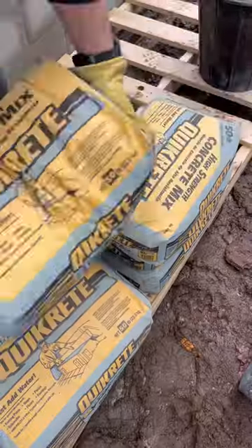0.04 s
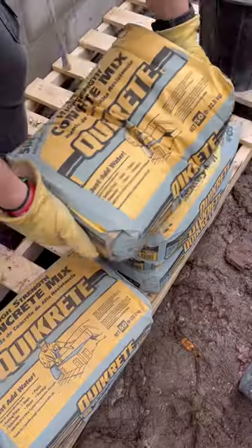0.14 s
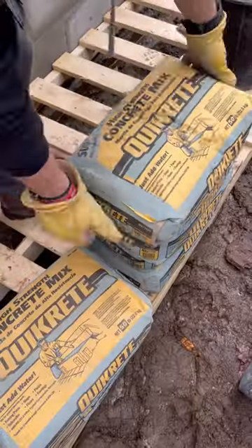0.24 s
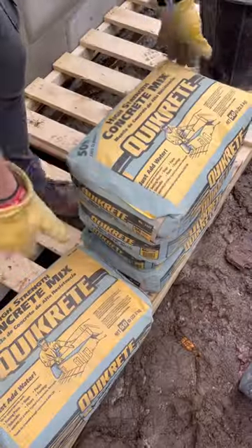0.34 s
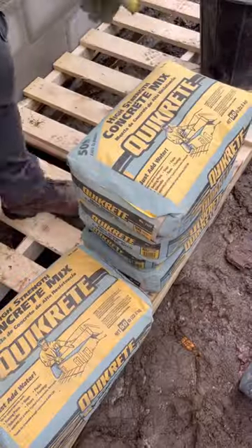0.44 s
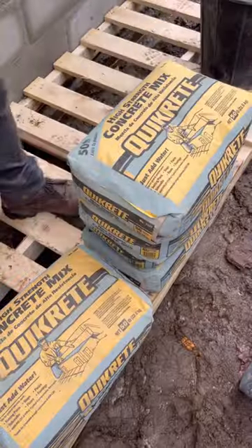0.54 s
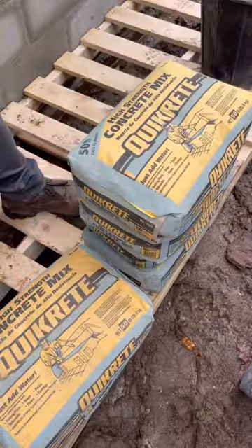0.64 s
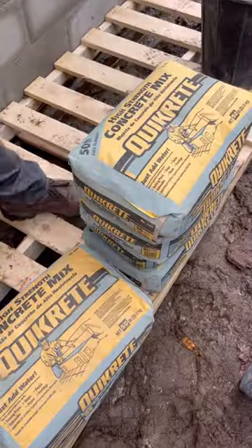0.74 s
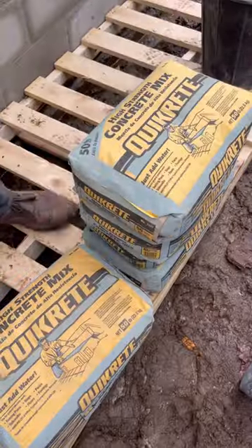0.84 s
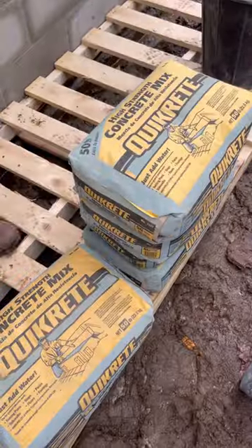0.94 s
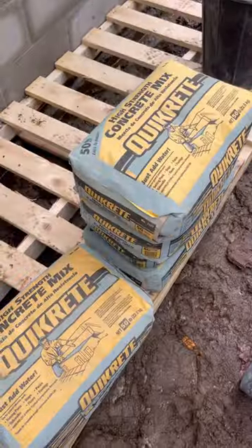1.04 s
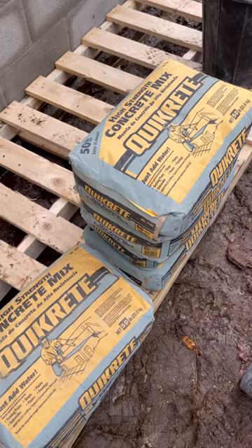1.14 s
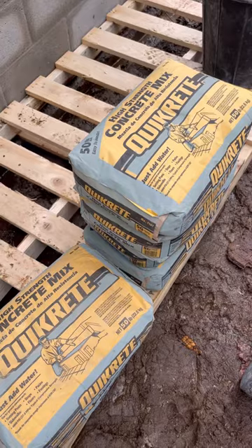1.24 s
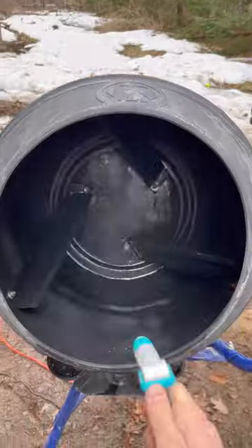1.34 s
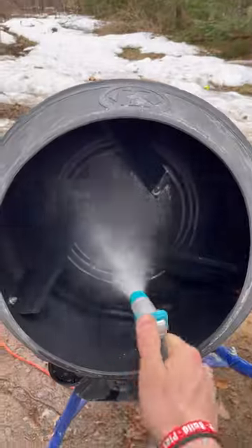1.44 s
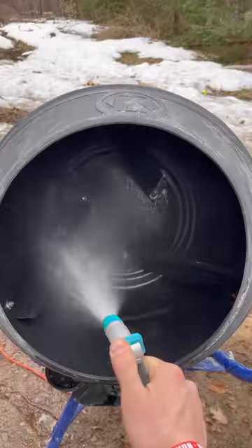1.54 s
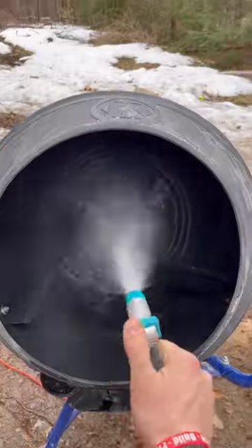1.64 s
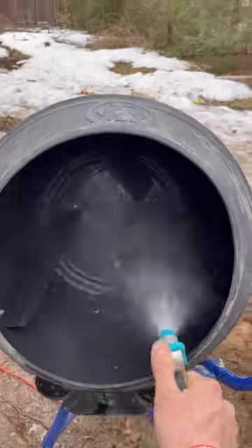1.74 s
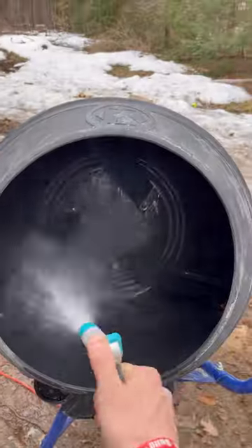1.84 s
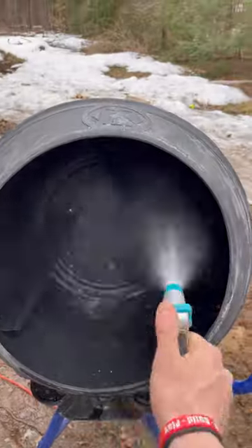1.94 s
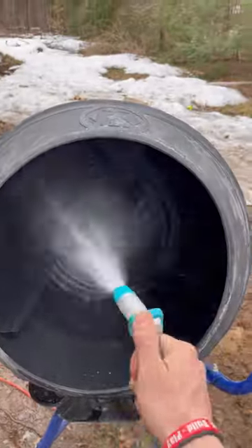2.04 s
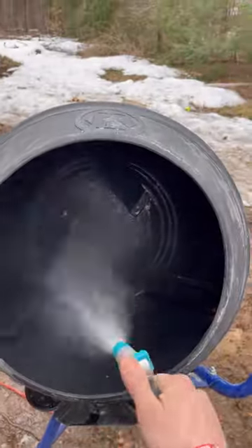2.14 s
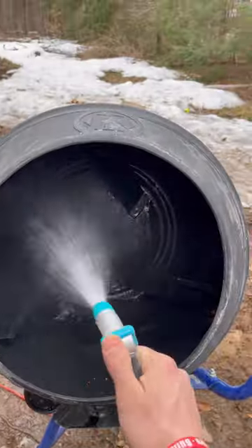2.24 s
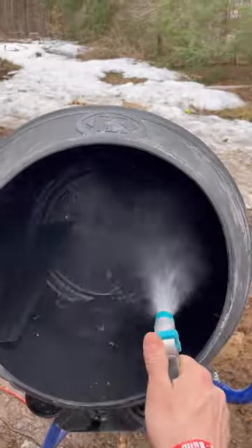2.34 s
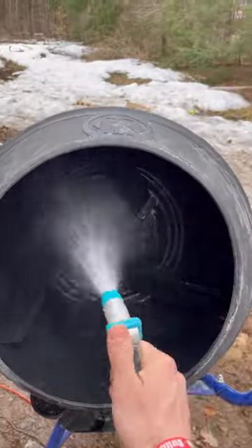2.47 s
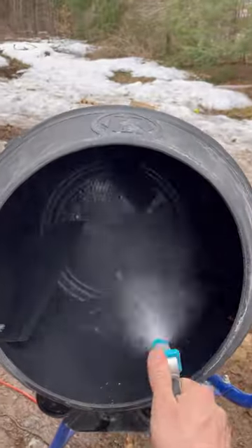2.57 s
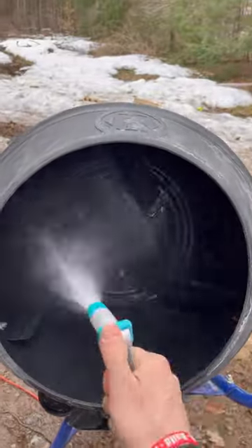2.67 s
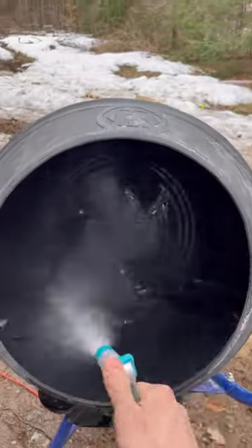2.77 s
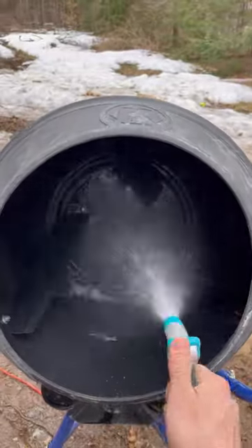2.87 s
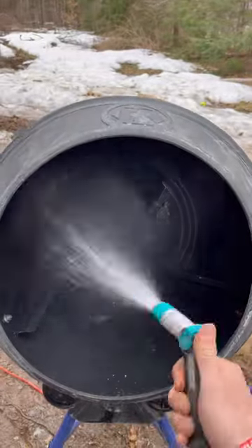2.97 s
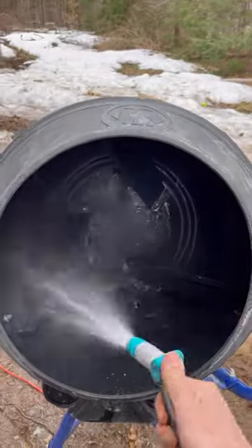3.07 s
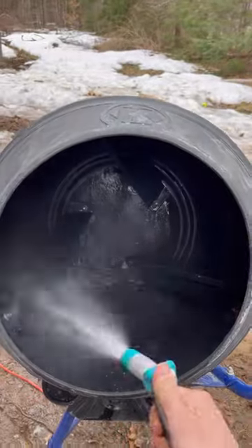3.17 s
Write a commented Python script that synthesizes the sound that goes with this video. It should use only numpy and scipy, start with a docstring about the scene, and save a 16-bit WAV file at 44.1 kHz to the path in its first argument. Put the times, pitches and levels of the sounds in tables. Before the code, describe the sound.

A hose nozzle sprays a hollow plastic drum, preceded by a paper sack's crunching thud

```python
"""A hose spray swept round inside a cement mixer's drum: noise-band mist hisses, random drops splash,
wall resonances drum, and the hollow hums and glugs, with short reflections added to mist and splash.
Before it a paper sack of concrete mix slides from gloved hands and lands on a stack on a pallet: shaped
noise and grains for the paper, decaying sines for the weight. A sole knocks on the slats, a short blip
falls in pitch, and filtered noise makes the nozzle click, leak and spit. A quiet yard lies behind."""
import sys
import numpy as np
from scipy import signal
from scipy.fft import rfft, irfft
from scipy.io import wavfile
from scipy.ndimage import uniform_filter1d

SR = 44100
rng = np.random.default_rng(int(sys.argv[2]) if len(sys.argv) > 2 else 0)


def store_wav(level_fs):
    """Save 16-bit WAV to argv[1]."""
    pcm = np.round(np.clip(np.atleast_2d(level_fs), -1, 1) * 32767)
    wavfile.write(sys.argv[1], SR, pcm.T.astype(np.int16))


N = 143325
T = np.arange(N) / SR
HZ = np.maximum(np.arange(N // 2 + 1) * SR / N, 1)
CUTOFF_HZ = 16000


def from_db(db):
    """Decibel definition: 20 dB is a tenfold amplitude ratio."""
    return 10 ** (np.asarray(db) / 20)


def rms_one(x):
    """Normalization: scale to unit rms."""
    return x / np.sqrt(np.mean(x ** 2) + 1e-20)


def curve(rows):
    """Amplitude envelope: gain interpolated in dB between (t/s, level/dB) points."""
    return from_db(np.interp(T, *np.transpose(rows)))


def response(points):
    """Frequency response: gain interpolated in dB over log frequency from (f/Hz, level/dB) points."""
    hz, db = np.transpose(points)
    return from_db(np.interp(np.log(HZ), np.log(hz), db))


def shaped(gain, source=None):
    """Linear filtering: white noise, or a given source, through a frequency response; rms 1."""
    if source is None:
        source = rng.standard_normal(N)
    return rms_one(irfft(rfft(source) * gain, N))


def resonances(modes, width_hz):
    """Modal resonance: steep-sided peaks at (f/Hz, level/dB), summed in power."""
    return np.sqrt(sum((from_db(db) / (1 + ((HZ - hz) / width_hz) ** 2)) ** 2 for hz, db in modes))


def band(hz, octaves):
    """Constant relative bandwidth: a bell on the octave scale."""
    return np.exp(-.5 * (np.log2(HZ / hz) / octaves) ** 2)


def burst(start, hold, t60):
    """Exponential decay: sudden start, hold, then a fall of 60 dB in t60."""
    decays = np.clip((T - start - hold) / t60, 0, 10)
    return (T >= start) * np.exp(-np.log(1000) * decays)


def swells(rows):
    """Power addition: bell-shaped swells from (t/s, level/dB, width/s) rows."""
    power = 0
    for s, db, width in rows:
        power = power + from_db(db) ** 2 * np.exp(-np.minimum(((T - s) / width) ** 2, 100))
    return np.sqrt(power)


def grains(per_s, spread_db):
    """Random impact process: dense tiny impulses of uneven size and sign."""
    sizes = from_db(spread_db * np.minimum(rng.exponential(1, N), 4))
    signs = rng.choice([-1, 1], N)
    return sizes * signs * (rng.random(N) < per_s / SR)


def evened(x, size):
    """Envelope flattening: divide a narrow noise by its running rms over size samples."""
    return x / np.sqrt(uniform_filter1d(x * x, size) + 1e-9)


def flicker(rate_hz, depth_db):
    """Amplitude modulation: a gain wandering at random by depth_db rms."""
    return from_db(depth_db * shaped(1 / (1 + (HZ / rate_hz) ** 2)))


def wavering(x, rate_hz, swing_s):
    """Frequency modulation by varying delay: the pitch wanders slowly; swing_s is rms."""
    delay = swing_s * shaped(np.exp(-(HZ / rate_hz) ** 2))
    return np.interp(T + delay, T, x)


def low_cut(x, hz):
    """Second-order high-pass filtering: roll off the bass."""
    return signal.sosfilt(signal.butter(2, hz, "high", fs=SR, output="sos"), x)


PATCH_HZ, PATCH_DB, PATCH_LOW_HZ = 16, 2.1, 1495


def patchy(gain, source, count=9):
    """Independent band modulation: overlapping bands each swell and fade on their own; rms 1."""
    place = np.interp(np.log(HZ), np.log([PATCH_LOW_HZ, CUTOFF_HZ]), [0, count - 1])
    spectrum = rfft(source) * gain
    total = 0
    for k in range(count):
        weight = np.maximum(1 - abs(place - k), 0)  # triangular band
        total = total + flicker(PATCH_HZ, PATCH_DB) * irfft(spectrum * weight, N)
    return rms_one(total)


SNAP_OCTAVES, SNAP_T60_S = 1.46, 0.013


def snaps(rows):
    """Impulsive radiation: short decaying cracks from (t/s, level/dB, f/Hz), each with its own brightness."""
    return sum(from_db(db) * burst(s, 0, SNAP_T60_S) * shaped(band(hz, SNAP_OCTAVES)) for s, db, hz in rows)


# spectrum of the yard: f/Hz, level/dB (relative)
YARD_SPECTRUM = [(30, -38), (135, 3.5), (350, -16), (1000, -25), (16000, -46)]
YARD_DB, YARD_END_S = -68.5, 1.34


def yard():
    """Broadband ambience: quiet, mostly low noise that holds, then decays exponentially."""
    return from_db(YARD_DB) * burst(0, YARD_END_S, t60=.2) * shaped(response(YARD_SPECTRUM))


STEP_S, STEP_DB, STEP_HOLD_S, STEP_T60_S = 1.089, -45, 0.015, 0.082
CRUSH_PER_S, CRACKLE_SPREAD_DB = 20000, 4
# spectrum of the slats underfoot: f/Hz, level/dB (relative)
SLAT_SPECTRUM = [(90, -12), (161, 8.5), (250, -8.5), (620, -1.5), (1050, -12), (1340, -2.5), (1650, -14),
                 (4500, -16), (9000, -24.5)]


def step():
    """Granular contact: a gritty sole knocks on the slats, whose response colours many tiny impacts."""
    grit = shaped(response(SLAT_SPECTRUM), grains(CRUSH_PER_S, CRACKLE_SPREAD_DB))
    return from_db(STEP_DB) * burst(STEP_S, STEP_HOLD_S, STEP_T60_S) * grit


# sack sliding and settling, soles scuffing: t/s, level/dB, width/s
RUSTLE_SWELLS = [(.03, -58, .04), (.082, -47.5, 0.017), (.16, -57, 0.035), (.23, -45, 0.015),
                 (.331, -38, 0.011), (.38, -56, 0.026), (.49, -58.5, 0.038), (.635, -52.5, 0.042),
                 (.94, -63, 0.12)]
# rustle spectrum: f/Hz, level/dB (relative)
RUSTLE_SPECTRUM = [(100, -7), (700, -1), (4500, 1), (9500, -6), (14000, 0)]
RUSTLE_PER_S = 3900


def rustle():
    """Granular friction: sparse grains swell as paper slides and soles scuff."""
    level = swells(RUSTLE_SWELLS) * flicker(rate_hz=31, depth_db=2.5)
    return level * shaped(response(RUSTLE_SPECTRUM), grains(RUSTLE_PER_S, CRACKLE_SPREAD_DB))


SLIDE_S, SLIDE_DB, SLIDE_WIDTH_S = 0.2364, -32, 0.0088
# spectrum of gloves on paper: f/Hz, level/dB (relative)
SLIDE_SPECTRUM = [(9000, -10.5), (12000, 4.5), (16000, -9)]


def slide():
    """Friction noise: gloves slip off the paper in one bright swell."""
    return swells([(SLIDE_S, SLIDE_DB, SLIDE_WIDTH_S)]) * shaped(response(SLIDE_SPECTRUM))


# the sack's paper is crushed on landing: t/s, level/dB
CRUSH_LEVEL = [(.2475, -23.5), (.262, -20), (.271, -23), (.275, -17.5), (.282, -24.5), (.296, -36),
               (.34, -80)]
# crushed paper spectrum: f/Hz, level/dB (relative)
PAPER_SPECTRUM = [(90, -4), (350, 3), (900, -4), (1600, 2), (4000, 2), (7000, -2)]
# creases snap and grit ticks: t/s, level/dB, f/Hz (centre)
CREASE_SNAPS = [(0.055, -42, 12200), (0.0705, -38.5, 12100), (0.1584, -39.5, 2480), (.2742, -12.5, 4500),
                (0.296, -26, 9000), (0.3335, -17.5, 4400), (0.3637, -20.5, 7100), (.611, -43.5, 5000),
                (.653, -42, 5230), (.679, -49, 600)]
# resonant peaks colour the crackle: f/Hz, level/dB (gain)
CRACKLE_PEAKS = [(2680, -3.5), (4356, 6), (5084, 3.5)]
PEAK_WIDTH_HZ = 110


def paper():
    """Resonant filtering: crushing grains and snaps pass through narrow resonant peaks."""
    crackle = shaped(response(PAPER_SPECTRUM), grains(CRUSH_PER_S, CRACKLE_SPREAD_DB))
    crush = curve(CRUSH_LEVEL) * (T > CRUSH_LEVEL[0][0]) * crackle
    crackling = crush + snaps(CREASE_SNAPS)
    coloured = 0
    for hz, db in CRACKLE_PEAKS:
        peak = signal.iirpeak(hz, hz / PEAK_WIDTH_HZ, fs=SR)
        coloured = coloured + from_db(db) * signal.lfilter(*peak, crackling)
    return crackling + coloured


# the weight comes down on the pallet: t/s, level/dB
THUD_BLOWS = [(0.253, -32), (0.262, -26.5), (0.281, -25.5), (0.311, -38.5), (.352, -42.5)]
# pallet modes: f/Hz, level/dB (added to each blow), t60/s
PALLET_MODES = [(119, 2.5, 0.082), (154.8, -6.5, 0.09)]


def thud():
    """Damped free vibration: each blow sets off the pallet's decaying sine modes."""
    total = 0
    for s, db in THUD_BLOWS:
        for hz, mode_db, t60 in PALLET_MODES:
            tone = np.sin(2 * np.pi * hz * (T - s))
            total = total + from_db(db + mode_db) * burst(s, 0, t60) * tone
    return total


def sack():
    """Superposition: friction, crushed paper and the weight on the pallet add together."""
    return slide() + rustle() + paper() + thud()


BLIP_S, BLIP_DB, BLIP_RISE_S, BLIP_HOLD_S, BLIP_T60_S = 1.2504, -36.5, 0.0007, 0.0086, .042
BLIP_DROP_HZ, BLIP_END_HZ, BLIP_FALL_S = 2440, 104, 0.00177


def blip():
    """Downward frequency glide: a sine's pitch drops within a few cycles."""
    hz = BLIP_END_HZ + BLIP_DROP_HZ / (1 + np.maximum(T - BLIP_S, 0) / BLIP_FALL_S) ** 2
    tone = np.sin(2 * np.pi * np.cumsum(hz * (T >= BLIP_S)) / SR)
    rise = np.clip((T - BLIP_S) / BLIP_RISE_S, 0, 1) ** 2
    return from_db(BLIP_DB) * rise * burst(BLIP_S, BLIP_HOLD_S, BLIP_T60_S) * tone


# the nozzle's trigger clicks: t/s, level/dB, f/Hz (centre)
TRIGGER_CLICKS = [(1.271, -52, 3500), (1.314, -60, 4600), (1.3235, -46, 1490)]
# the valve starts to leak: t/s, level/dB
VALVE_LEAK = [(1.324, -55.5), (1.375, -61.5), (1.43, -55)]
# leak spectrum: f/Hz, level/dB (relative)
LEAK_SPECTRUM = [(110, -21.5), (350, 2), (15000, -17)]
# spit spectrum: f/Hz, level/dB (relative)
SPIT_SPECTRUM = [(150, -27), (480, 11.5), (850, -1.5)]
SPIT_S, SPIT_DB, SPIT_HOLD_S, SPIT_T60_S = 1.435, -37.5, 0.01, 0.019


def nozzle():
    """Turbulent flow noise: the trigger clicks, the valve leaks, then the nozzle spits."""
    leak_gain = response(LEAK_SPECTRUM) * (HZ > LEAK_SPECTRUM[0][0])
    leak = curve(VALVE_LEAK) * (T > VALVE_LEAK[0][0]) * shaped(leak_gain)
    spit = burst(SPIT_S, SPIT_HOLD_S, SPIT_T60_S) * shaped(response(SPIT_SPECTRUM))
    return snaps(TRIGGER_CLICKS) + leak + from_db(SPIT_DB) * spit


# steady mist, before MIST_DB is added: t/s, level/dB
MIST_STEADY = [(1.45, -39.5), (2.98, -42), (3.04, -44)]
# mist spectrum: f/Hz, level/dB (relative)
MIST_SPECTRUM = [(200, -59), (4000, -7), (6500, -2.5), (8200, 2.5), (13600, 2), (16000, -5.5)]
# the hiss flares as the nozzle turns: t/s, level/dB
HISS_FLARES = [(1.61, -35.5), (1.832, -31.5), (2.19, -38), (2.31, -37), (2.425, -36), (2.64, -33.5),
               (2.865, -34)]
MIST_DB, FLARE_WIDTH_S, FLARE_HZ, FLARE_OCTAVES = 2, 0.017, 13200, 0.48


def mist():
    """Jet noise: a flickering hiss with bright flares; returns the middle and side signals."""
    level = from_db(MIST_DB) * curve(MIST_STEADY) * flicker(rate_hz=25, depth_db=1.54)
    flare_level = swells([(s, db, FLARE_WIDTH_S) for s, db in HISS_FLARES])
    flares = flare_level * shaped(band(FLARE_HZ, FLARE_OCTAVES))
    hiss = level * patchy(response(MIST_SPECTRUM), rng.standard_normal(N))
    return hiss + flares, level * shaped(response(MIST_SPECTRUM))


# the jet sweeps close over the wall: t/s, width/s, drumming level/dB, splashing level/dB
JET_SWEEPS = [(1.512, 0.029, -34.5, -34.5), (1.66, 0.025, -70, -37.5), (1.701, 0.021, -40.5, -42),
              (1.752, 0.012, -47, -39), (2.0, 0.017, -74, -39), (2.045, 0.0075, -40.5, -38),
              (2.178, 0.014, -44, -36), (2.388, 0.011, -42, -33), (2.59, 0.016, -40, -34.5),
              (2.92, 0.023, -36.5, -41), (2.963, 0.015, -36, -40)]
# splash spectrum: f/Hz, level/dB (relative)
SPLASH_SPECTRUM = [(100, -41), (270, -19), (750, -11), (1100, -18), (1550, -8.5), (2000, -3.5),
                   (2500, -7.5), (3500, -4), (4200, 2), (5100, 3), (6300, -7.5), (8200, -1.5),
                   (10000, -20.5)]
SPLASH_DB, DROPS_PER_S, SPATTER_SPREAD_DB = -40.5, 7000, 3.5


def splash():
    """Random drop impact: spatter swells with each sweep; returns the middle and side signals."""
    swept = swells([(s, db, width) for s, width, _, db in JET_SWEEPS])
    level = np.hypot(from_db(SPLASH_DB), swept) * flicker(rate_hz=45, depth_db=1.86)
    spatter = patchy(response(SPLASH_SPECTRUM), grains(DROPS_PER_S, SPATTER_SPREAD_DB))
    return level * spatter, level * shaped(response(SPLASH_SPECTRUM))


# drum wall modes: f/Hz, level/dB (relative)
WALL_MODES = [(1495, -1), (1720, -1.5), (1990, 0), (2290, -4.5)]
WALL_WIDTH_HZ, WALL_STEADY_DB = 74, -54.5


def wall():
    """Forced plate vibration: the sweeping jet drums on the wall's resonances."""
    swept = swells([(s, db, width) for s, width, db, _ in JET_SWEEPS])
    level = np.hypot(from_db(WALL_STEADY_DB), swept)
    return level * evened(shaped(resonances(WALL_MODES, WALL_WIDTH_HZ)), size=900)


# modes of the drum's hollow: f/Hz, level/dB (relative)
HOLLOW_MODES = [(353, -4), (530, 6.5)]
HOLLOW_WIDTH_HZ, HOLLOW_DB = 32, -53


def hollow():
    """Cavity resonance: narrow noise bands hum along with a wandering pitch."""
    hum = shaped(resonances(HOLLOW_MODES, HOLLOW_WIDTH_HZ))
    return from_db(HOLLOW_DB) * wavering(hum, rate_hz=5, swing_s=.0012)


# the jet stirs the pooled water and the hollow glugs: t/s, level/dB, f/Hz
HOLLOW_GLUGS = [(1.792, -46.5, 460), (1.951, -47, 630), (2.153, -46.5, 514), (2.331, -42.5, 585),
                (2.54, -42, 554), (2.643, -46, 510), (2.808, -47.5, 540), (3.24, -47, 535)]
GLUG_WIDTH_S, GLUG_OCTAVES = 0.015, 0.1


def glugs():
    """Narrow-band resonance: each glug is a brief swell of nearly tonal noise."""
    total = 0
    for s, db, hz in HOLLOW_GLUGS:
        tone = evened(shaped(band(hz, GLUG_OCTAVES)), size=1200)
        total = total + swells([(s, db, GLUG_WIDTH_S)]) * tone
    return total


# fat drops bump the drum's belly: t/s
PLOP_TIMES = [1.896, 1.93, 3.054]
PLOP_DB, PLOP_HZ, PLOP_T60_S = -46, 265, .05


def plops():
    """Damped free vibration: each fat drop sets off one decaying sine."""
    tones = sum(burst(s, 0, PLOP_T60_S) * np.sin(2 * np.pi * PLOP_HZ * (T - s)) for s in PLOP_TIMES)
    return from_db(PLOP_DB) * tones


DRUM_ECHO_DB, DRUM_T60_S = -8, 0.022


def in_drum(x, count=40):
    """Early reflection: quick, dying echoes between the drum's walls join the direct sound."""
    delays = rng.uniform(.002, .03, count)
    gains = from_db(-60 * delays / DRUM_T60_S) * rng.choice([-1, 1], count)
    gains = from_db(DRUM_ECHO_DB) * gains / np.sqrt(np.sum(gains ** 2))
    echoes = sum(g * np.pad(x, (int(s * SR), 0))[:N] for s, g in zip(delays, gains))
    return (x + echoes) / np.hypot(1, from_db(DRUM_ECHO_DB))


OPEN_S, OPEN_RISE_S, SPREAD_DB = 1.447, 0.03, -30.5


def spray():
    """Source superposition: hiss, splash and resonances open together and spread a little sideways."""
    mist_middle, mist_side = mist()
    splash_middle, splash_side = splash()
    middle = in_drum(mist_middle + splash_middle) + wall() + hollow() + glugs() + plops()
    side = from_db(SPREAD_DB) * (mist_side + splash_side)
    opening = np.clip((T - OPEN_S) / OPEN_RISE_S, 0, 1)
    return opening * (middle + side * np.array([[1], [-1]]))


SACK_LAG_S, WATER_LOW_CUT_HZ = .000018, 180


def scene():
    """Interaural time difference: a lag sets the sack and step aside; the drum is straight ahead."""
    near = rfft(sack() + step())
    turn = np.pi * HZ * SACK_LAG_S  # half the lag, as phase, in each channel
    placed = np.array([irfft(near * np.exp(1j * turn * side), N) for side in (1, -1)])
    water = low_cut(nozzle() + spray(), WATER_LOW_CUT_HZ)
    return placed + blip() + water + yard()


# stereo width, nearly mono in the middle range: f/Hz, side level/dB (gain)
SIDE_RESPONSE = [(800, 0), (2200, -20), (4200, 0.5)]
LOW_CUT_HZ = 84


def record(dry):
    """Mid-side filtering: narrow the image, roll off the deep bass, cut the top steeply."""
    side = irfft(rfft((dry[0] - dry[1]) / 2) * response(SIDE_RESPONSE), N)
    stereo = dry.mean(axis=0) + side * np.array([[1], [-1]])
    thinned = low_cut(stereo, LOW_CUT_HZ)
    return signal.sosfilt(signal.ellip(12, .1, 75, CUTOFF_HZ, fs=SR, output="sos"), thinned)


dry = scene()
out = record(dry)
store_wav(out)
```